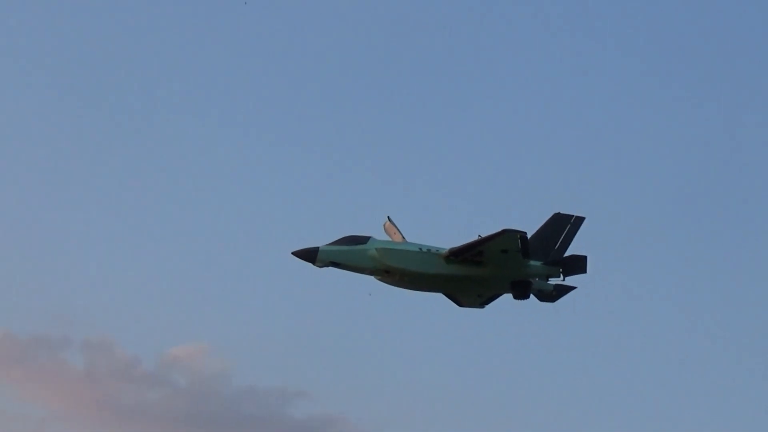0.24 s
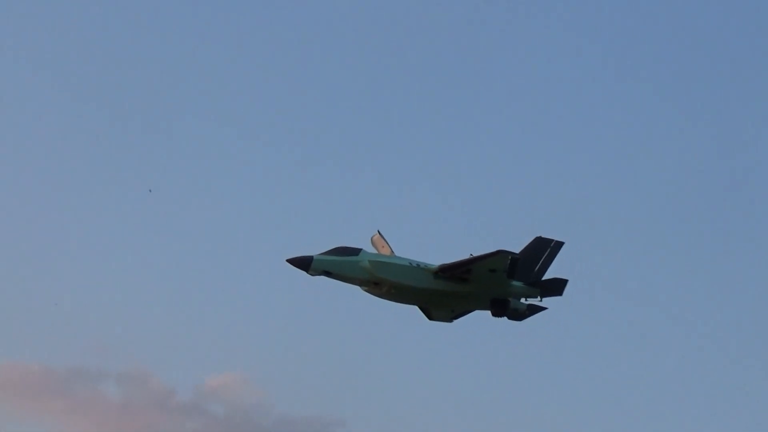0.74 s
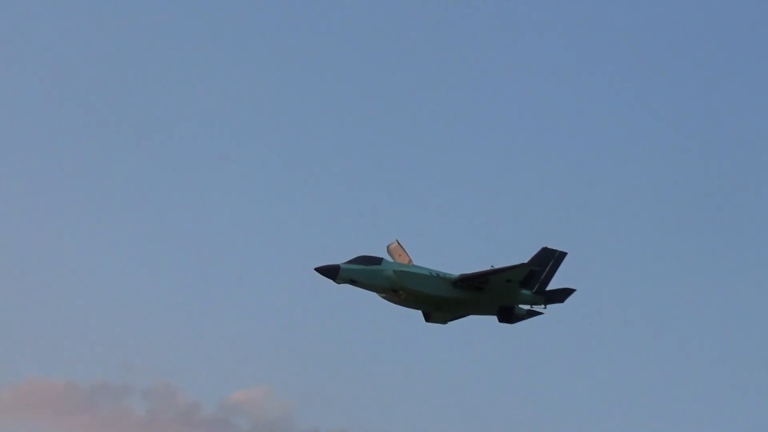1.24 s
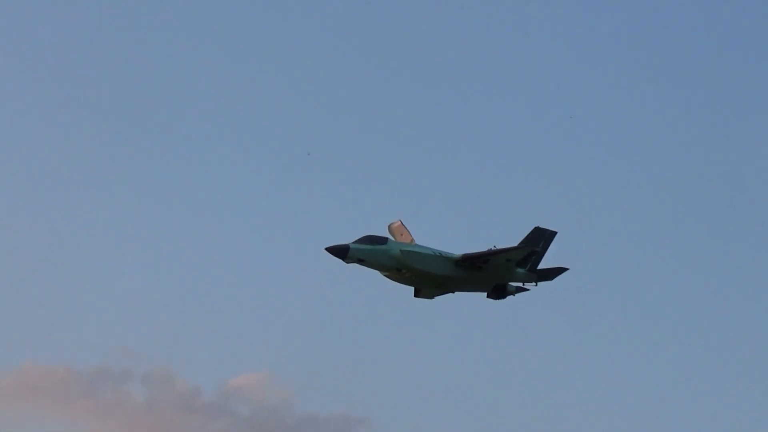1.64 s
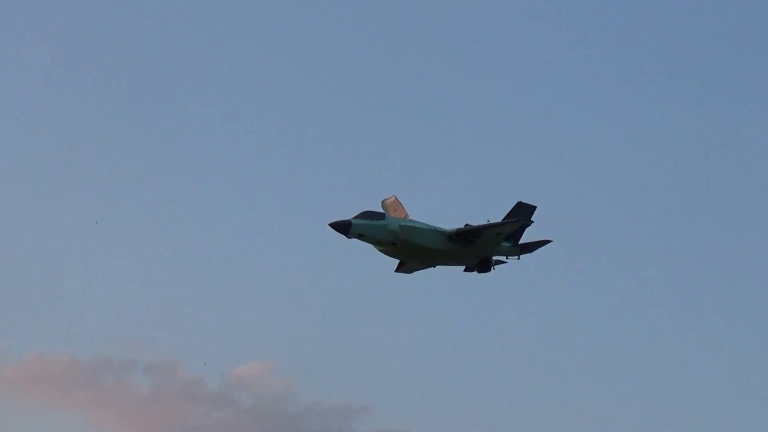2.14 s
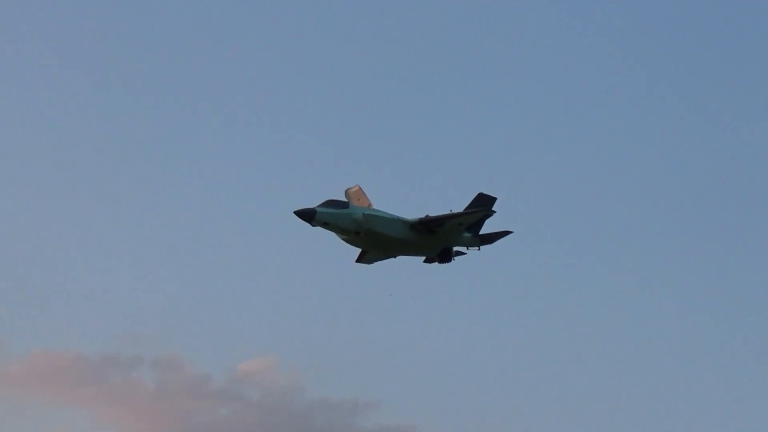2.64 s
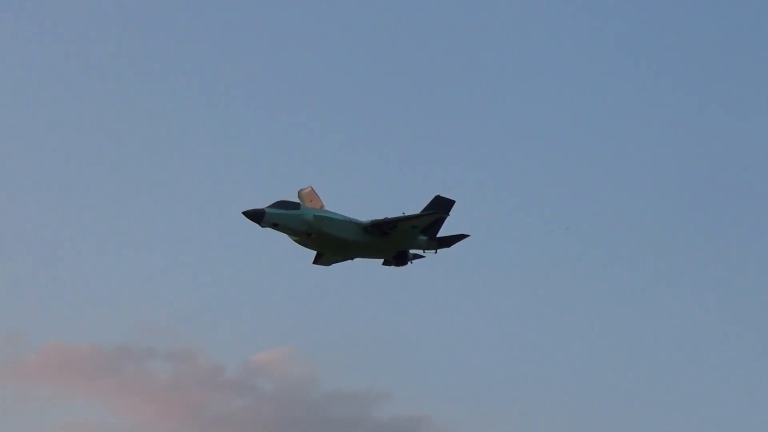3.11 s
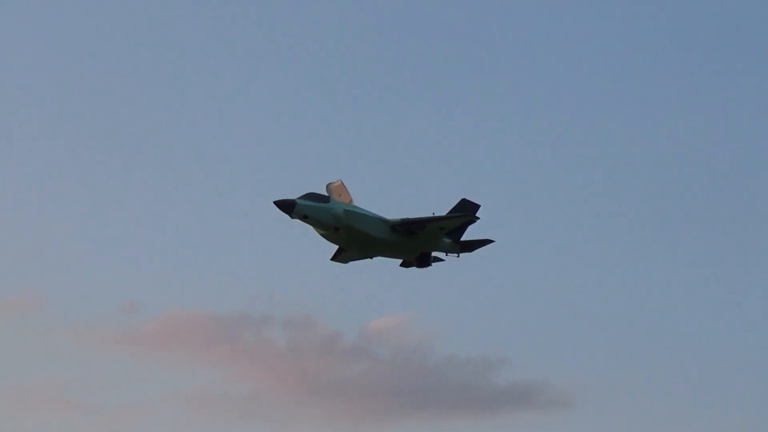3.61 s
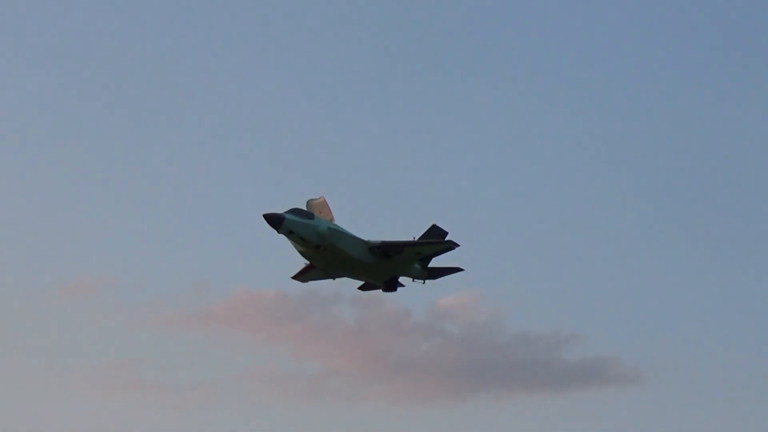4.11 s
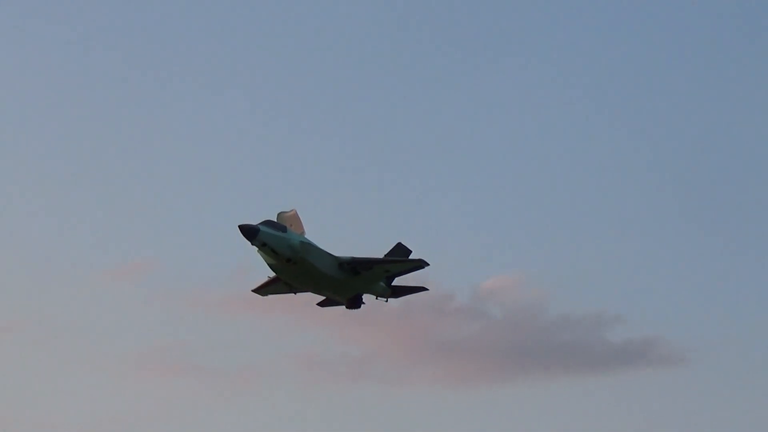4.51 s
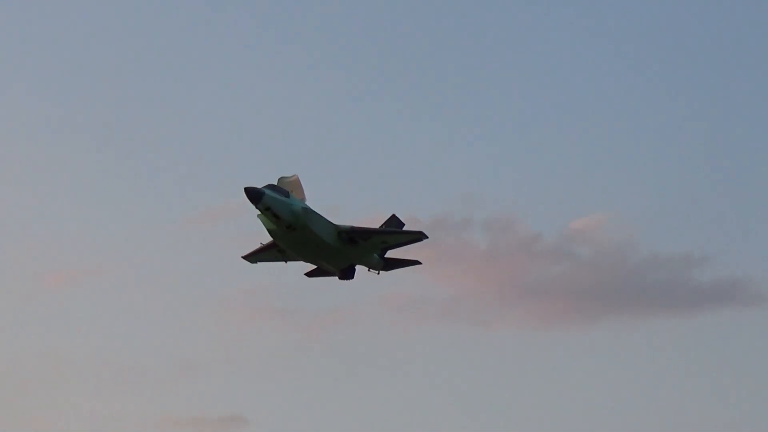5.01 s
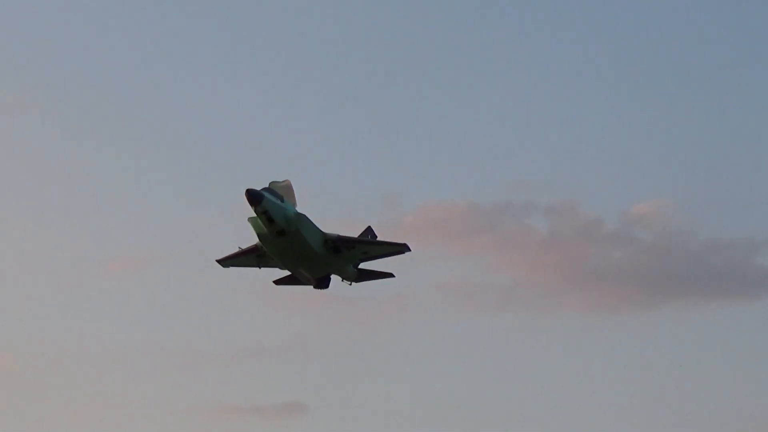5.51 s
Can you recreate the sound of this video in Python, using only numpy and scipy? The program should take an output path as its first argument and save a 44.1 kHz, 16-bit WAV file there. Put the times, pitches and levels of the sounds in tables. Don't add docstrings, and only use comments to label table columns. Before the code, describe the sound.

A hovering model jet's ducted fans scream in two piercing, very high whines over a steady airy roar and bright hiss in the open.

```python
import sys
import numpy as np
from scipy import signal
from scipy.fft import rfft, irfft, next_fast_len
from scipy.io import wavfile
from scipy.ndimage import uniform_filter1d, map_coordinates

SR = 44100
rng = np.random.default_rng(int(sys.argv[2]) if len(sys.argv) > 2 else 0)


def amplitude_ratio(level_db):
    exponent = np.asarray(level_db, float) / 20
    return 10 ** exponent


def generate_wav(sig):
    pcm = np.round(np.clip(np.atleast_2d(sig).T, -1, 1) * 32767).astype(np.int16)
    wavfile.write(sys.argv[1], SR, pcm)


N = 253575
BLADES = 12
LIFT_HZ, TAIL_HZ = 7750, 7220
TURN_S, TURN_TAKES_S = 3.5, 0.75


def ducted_fans():
    # (time [s], speed [%])
    throttle = [(0, 100), (1.84, 99.98), (2.09, 99.15), (2.125, 98.9), (2.2, 96.9), (2.3, 96.3),
                (2.5, 96.4), (3.62, 96.47), (3.77, 97.4), (3.95, 97.8), (4.1, 98.6), (4.29, 100.5),
                (4.7, 100.47), (5.5, 99.95), (5.75, 100.05)]
    # (time [s], half length [s], blade rate [Hz])
    pitch_trim = [(0.04, 0.065, -20), (0.3, 0.1, 30), (0.52, 0.08, -21), (0.68, 0.05, 40),
                  (0.84, 0.08, -60), (1.22, 0.13, 39), (1.6, 0.17, -63), (1.78, 0.08, 32), (2.02, 0.1, 176),
                  (2.32, 0.08, -27), (2.52, 0.1, 23), (2.7, 0.3, 45), (3.2, 0.13, 19), (3.4, 0.065, -35),
                  (3.78, 0.1, -27), (4.12, 0.08, -27), (4.34, 0.22, -12), (4.56, 0.1, -22),
                  (4.9, 0.065, -29), (5.54, 0.3, 24), (.92, .04, 10), (2.12, .04, 4), (1.5, .1, -10),
                  (4.63, .05, 6), (2.56, .04, 10), (3.65, .07, -12), (4.35, .05, 10), (5.05, .06, 14),
                  (5.17, .04, -6), (5.3, .05, 14), (5.39, .04, -8), (5.47, .04, 12), (5.65, .05, 10)]
    speed = curves(throttle)[0] / 100
    trim = (bumps(pitch_trim) + 2.5 * wobble(11)) / LIFT_HZ
    lift = lift_fan((speed + trim) * LIFT_HZ / BLADES)
    tail = tail_fan((speed - trim) * TAIL_HZ / BLADES)
    return lift + tail


def lift_fan(shaft_hz):
    # (time [s], blade tone [dB], its octave [dB])
    tones = [(0, -24, -39), (.3, -25, -34), (.68, -26.5, -32), (.85, -31, -29), (1.2, -32.5, -35),
             (1.65, -27, -31), (1.9, -26, -34), (2.15, -28, -31), (2.45, -26, -23), (3, -24.5, -27.5),
             (3.28, -24, -28), (3.55, -29, -24), (3.8, -23, -25.5), (4.1, -20.5, -32.5), (4.3, -21, -42),
             (4.65, -18, -40), (5.5, -17, -41), (5.75, -21.5, -43)]
    # (multiple [1], level side-on [dB], change nose-on [dB])
    uneven = [(1, -50, -4.5), (2, -56.5, -6), (4, -50, -4), (5, -56, -5.5), (6, -49.5, -12.5)]
    # (multiple [1], level re order 6 [dB])
    weak_orders = [(7, -9), (8, -10.5), (10, -5), (13, -5), (14, -4), (16, -2), (17, -6), (18, -7)]
    # (multiple [1], time [s], half length [s], change [dB])
    lobes = [(12, 0.96, 0.046, -8), (12, 1.955, 0.043, -8), (12, 3.39, 0.054, -10), (12, 3.5, 0.034, -2),
             (12, 3.63, .03, -3), (24, 3.49, .03, 4.5), (24, 3.56, .03, -3), (24, 1.15, .1, -3),
             (12, 5.04, 0.059, -2), (24, 4.43, .04, 4), (24, 4.66, .05, -6), (6, 0.75, 0.6, 4),
             (6, 1.6, 0.16, 7), (6, 0.89, 0.082, 5), (6, 1.25, .12, -1), (24, .55, .06, 3),
             (24, .87, .05, 3), (24, 1.58, .06, 3), (24, 2.8, .08, 1), (24, 4.35, .03, -7),
             (24, 4.95, .03, -6), (24, 5.35, .04, 5), (24, 5.0, .6, 0), (2, 5.7, .2, 12),
             (1, 4.8, 0.5, 3.5), (24, 2.8, .05, -2), (12, 1.9, .03, 0), (2, 3.3, 0.17, 3),
             (2, 3.75, .06, 4), (6, 0.47, .06, 3), (24, 4.47, .06, 4), (24, 4.78, .03, 3),
             (24, 1.12, .05, 3), (24, .15, .1, 4), (6, 2.47, .1, 1), (6, 3.03, .13, -7), (6, 3.54, 0.18, 4),
             (12, 3.505, .022, -6), (12, 2.13, .03, -2), (12, 1.955, .025, 2), (12, 0.94, .025, 5),
             (12, .8, .04, -2.5), (12, 5.37, 0.035, 2), (12, 4.9, .15, -1), (24, 4.75, .06, 3),
             (24, 5.08, .07, -3), (24, 5.5, .1, 2)]
    # (multiple [1], time [s], half length [s], change [dB])
    more_lobes = [(1, 0.78, 0.94, 4.5), (2, 2.76, 0.59, 6), (2, 3.65, 0.23, 18), (4, 4.73, .35, 6.5),
                  (5, 4.7, .35, 11), (4, .1, .4, 1.5), (5, .1, 0.44, 7), (5, 1.2, .6, 4), (5, 1.8, .1, 3),
                  (1, 1.85, .15, -5), (4, .8, .12, 3), (4, 2.05, .1, 4)]
    blade_db, octave_db = curves(tones)
    blade_db = blade_db + .45 * wobble(55)
    octave_db = octave_db + 1.2 * wobble(20) + 1.2 * wobble(32)
    main = [(BLADES, blade_db, 0), (2 * BLADES, octave_db, 0)]
    orders = aimed(main + uneven, lobes + more_lobes)
    six_db = orders[-1][1]
    orders = orders + [(k, six_db + db + 1.5 * wobble(2.56)) for k, db in weak_orders]
    return rotor(shaft_hz, orders, jitter_hz=0.37, flutter_db=0.17, quick=70, skirt_db=-23)


def tail_fan(shaft_hz):
    # (time [s], blade tone [dB], its octave [dB])
    tones = [(0, -24, -36), (.3, -22, -33), (.6, -20.5, -33), (.85, -21, -29), (1.25, -23.5, -28),
             (1.5, -23, -28), (1.8, -23.5, -34), (2.2, -24, -35), (2.55, -29, -37), (2.9, -27, -35),
             (3.45, -26, -38), (3.63, -29.5, -29), (3.9, -27.5, -36), (4.12, -26, -47), (4.3, -26.5, -41),
             (4.8, -28, -37), (5.3, -29.5, -35), (5.75, -26, -32)]
    # (multiple [1], level [dB])
    faint_orders = [(1, -56.5), (2, -82), (4, -68), (8, -56), (10, -65), (14, -47), (16, -59)]
    # (multiple [1], time [s], half length [s], change [dB])
    lobes = [(24, .48, .03, -12), (24, 1.9, .05, -10), (24, 1.8, .04, 4), (24, 0.84, .04, 3),
             (24, .94, .03, -3), (24, 2.12, .04, -3), (24, 5.7, .08, 4), (12, 1.76, 0.074, -1.5),
             (12, 6.2, 0.039, 2), (12, 3.83, 0.041, -1), (12, 3.64, .04, -2.5), (12, 4.5, .05, -2),
             (12, 4.74, .02, 3), (12, 4.85, .03, 4), (12, 2.92, 0.091, 1), (12, 3.35, .05, -0.5),
             (24, 4.27, .1, 7), (24, 4.7, .04, 3), (24, 5.05, .06, 0), (24, 1.2, .05, -4),
             (24, 1.3, .35, -1.5), (24, 2.85, .5, 2), (24, 4.14, .06, -4), (24, 4.55, .15, 2),
             (24, 3.93, .04, -3), (12, 3.9, 0.054, -3), (12, 2.57, .03, -1.5), (12, 4.85, 0.056, -5.5),
             (12, 4.8, .05, -2)]
    blade_db, octave_db = curves(tones)
    blade_db = blade_db + .6 * wobble(55)
    octave_db = octave_db + 1.4 * wobble(20)
    orders = aimed([(BLADES, blade_db, 0), (2 * BLADES, octave_db, 0)], lobes)
    return rotor(shaft_hz, orders + faint_orders, jitter_hz=0.463, flutter_db=0.5, quick=70, skirt_db=-25.5)


def wing_rotors():
    return near_rotor() + far_rotor()


def near_rotor():
    # (time [s], turn rate [Hz], level [dB])
    hum = [(0, 1376, -43), (.3, 1364, -45.5), (.8, 1351, -44.5), (1, 1355, -41.5), (1.2, 1385, -34),
           (1.55, 1385, -30), (1.68, 1415, -30), (1.98, 1368, -30.5), (2.37, 1316, -38.5), (2.7, 1318, -38),
           (3.06, 1357, -36), (3.35, 1371, -31), (3.55, 1377, -32), (3.8, 1371, -37.5), (4, 1368, -41),
           (4.28, 1396, -41), (4.88, 1393, -39.5), (5.15, 1388, -48), (5.35, 1383, -42),
           (5.75, 1372, -42.5)]
    # (multiple [1], level side-on [dB], change nose-on [dB])
    upper = [(2, -50, -2), (3, -54, -6), (4, -56.5, 0), (6, -45, -5)]
    # (multiple [1], level [dB])
    steady = [(5, -64), (7, -48)]
    # (multiple [1], time [s], half length [s], change [dB])
    lobes = [(2, .1, .2, -9), (2, 1.68, 0.16, 5.5), (2, 2.34, 0.31, 4), (2, 4, 0.28, -3), (2, 4.4, 0.29, 7),
             (3, .1, 0.27, 7.5), (3, 2, 0.55, 7), (3, 3.4, 0.75, 9.5), (3, 5.14, .11, 13.5),
             (3, 1.0, .08, -5), (3, 0.29, .08, -4), (3, 4.3, .3, -4), (3, 5.45, .1, -6), (2, 5.2, 0.065, 5),
             (1, .35, .05, 0), (1, 0.84, .05, 5), (1, 4.4, .04, 2), (3, 1.2, .06, 0), (3, 3.7, .08, 4),
             (3, 3.2, .08, 3), (2, 4.4, .1, -5), (1, .5, .12, 3), (1, 4.42, .05, -2), (1, 1.12, .04, 1.5),
             (2, 4.3, .08, 3), (2, .4, .25, 3), (2, 2.05, .1, -4), (4, 4.4, .6, -6), (2, 4.3, .15, -1),
             (3, 4.7, .25, 3), (1, 3.72, 0.044, 3), (3, 5.86, .2, 12), (4, 0.38, 0.9, 7.5),
             (4, 4, 0.52, 6.5), (6, .1, .3, 3), (6, .95, .15, -4), (6, 1.6, 0.28, 6), (6, 3.57, 0.26, 7),
             (6, 4.14, 0.39, 13.5), (6, 3.8, .07, -6), (6, 5.1, .08, 7), (6, 5.0, .1, -3), (6, 5.6, .35, 5),
             (6, 2.05, .2, 4), (6, 2.5, .12, -1), (6, 3.1, .2, 6), (2, 3.2, 0.11, -3), (1, 2.1, .03, -3.5)]
    hz, hum_db = curves(hum)
    orders = aimed([(1, hum_db, 0)] + upper, lobes) + steady
    return rotor(hz, orders, jitter_hz=1.6, flutter_db=.7, quick=90, skirt_db=-36, hunt_hz=3.6)


def far_rotor():
    # (time [s], turn rate [Hz], level [dB])
    hum = [(0, 1418, -46), (.27, 1440, -42), (.7, 1440, -44), (1, 1457, -44), (1.18, 1424, -65),
           (1.4, 1394, -62), (1.9, 1408, -59), (2.07, 1421, -51), (2.25, 1374, -44), (2.6, 1406, -49),
           (2.95, 1365, -52), (3.2, 1336, -49), (3.7, 1328, -49), (3.9, 1377, -52), (4.2, 1395, -63),
           (5.3, 1400, -60), (5.5, 1410, -58), (5.75, 1415, -49)]
    # (multiple [1], level side-on [dB], change nose-on [dB])
    upper = [(2, -52.5, 0), (6, -43.5, -4)]
    # (multiple [1], level [dB])
    steady = [(3, -65)]
    # (multiple [1], time [s], half length [s], change [dB])
    lobes = [(2, .9, .5, -7), (6, 1.4, .3, -5), (6, 2.42, .4, 4), (6, 5.66, 0.29, 12), (6, 2.0, .15, 0),
             (6, 2.7, .25, 0), (6, 4.8, .1, 7), (6, 3.9, .5, -8)]
    hz, hum_db = curves(hum)
    orders = [(1, hum_db)] + aimed(upper, lobes) + steady
    return rotor(hz, orders, jitter_hz=1.5, flutter_db=1.5, quick=90, skirt_db=-34, hunt_hz=4)


def air_jets():
    # (time [s], level [dB])
    strength = [(0, -30), (.3, -31.5), (.5, -30.5), (1, -30.5), (1.5, -31.5), (1.9, -34), (2.25, -30.5),
                (3, -32.5), (3.3, -33), (3.7, -33), (3.85, -34), (4.3, -34.5), (4.5, -34), (5, -33),
                (5.4, -33), (5.75, -32.5)]
    # (time [s], half length [s], change [dB])
    gusts = [(.25, .03, -1.5), (1.07, .04, -2.5), (1.2, 0.038, 1), (2.03, 0.044, 3), (2.14, .04, 0),
             (2.42, 0.042, 2), (3.34, 0.032, 2.5), (3.5, .06, 1.5), (3.7, 0.046, 2), (4.1, 0.096, -2),
             (4.33, .04, 2.5), (4.75, 0.14, 4.5), (5.44, 0.04, -4), (5.68, 0.058, 0.5)]
    jet_db, = curves(strength)
    swing_db = jet_db - jet_db.mean() + bumps(gusts)
    gust = wobble(9)
    air_flutter = wobble(20)
    low = jet_roar(swing_db, gust, air_flutter) + downwash_rush(swing_db, gust, air_flutter)
    return low + intake_hiss(swing_db, gust) + nozzle_fizz(swing_db, gust)


def jet_roar(swing_db, gust, air_flutter):
    # (frequency [Hz], level [dB])
    spectrum = [(20, -44), (110, -34), (190, -5), (270, -4.5), (350, -2.5), (470, -3.5), (650, 2),
                (1000, -1.5), (1500, -13.5), (2500, -38)]
    # (time [s], half length [s], change [dB])
    low_dips = [(.8, .15, -1), (1.85, .2, -1), (2.5, .15, -0.5), (4.12, .15, -0.5), (4.7, .08, -0.5)]
    level_db = -38.5 + 0.87 * swing_db - 2.4 * turned() + bumps(low_dips)
    level_db = level_db + 0.14 * gust + 0.62 * air_flutter
    return amplitude_ratio(level_db) * jet_noise(spectrum, band_share_db=-1.5, patchy_db=0.27)


def downwash_rush(swing_db, gust, air_flutter):
    # (frequency [Hz], level [dB])
    spectrum = [(600, -24), (1200, -4), (2000, 0), (2800, -3.5), (3500, -5), (4300, -4), (5200, -11),
                (6000, -4), (6800, -7), (8000, -37)]
    # (time [s], half length [s], change [dB])
    rush_swells = [(2.46, 0.6, 1), (3.59, 0.14, 3), (0.73, .1, -1.8), (4.25, .12, -1), (3.82, 0.063, -3),
                   (1.13, 0.091, -0.5), (1.94, .1, -0.5), (3.6, 0.07, -1), (5.62, .08, 1), (4.75, .1, -0.5)]
    # (frequency [Hz], level [dB])
    wing = [(4300, 0), (4700, -2), (5300, -5), (5700, -2), (6500, -2), (7000, 0)]
    # (time [s], half length [s], share [1])
    wing_shades = [
        (1.3, .25, 0.65),
        (1.75, .25, 0.97),
        (4.15, .12, 0.69),
    ]
    level_db = -37.5 + 0.58 * swing_db - 0.26 * turned() + bumps(rush_swells)
    level_db = level_db + 0.5 * gust + 0.84 * air_flutter
    rush = amplitude_ratio(level_db) * jet_noise(spectrum, band_share_db=2.0, patchy_db=0.63)
    shaded = np.clip(bumps(wing_shades), 0, 1)
    return (1 - shaded) * rush + shaded * coloured(rush, wing)


def intake_hiss(swing_db, gust):
    # (frequency [Hz], level [dB])
    spectrum = [(5500, -47), (6600, -5.5), (7500, 1), (8300, -4), (8800, -2), (9600, 0.5), (11000, -0.5),
                (12000, -5.5), (12800, -15), (14000, -35)]
    # (time [s], half length [s], change [dB])
    band_swells = [(.15, .2, 0.2), (.85, .15, 0.8), (2.9, .08, 1), (3.5, 0.071, 0.8), (3.98, .12, 2),
                   (4.9, 0.23, -2), (5.65, 0.11, 2)]
    # (frequency [Hz], level [dB])
    stator = [(7000, -1.5), (8300, -3.5), (8750, -6.5), (9300, -1.5), (10000, -1.5)]
    nose_on = turned()
    level_db = -32.0 + 0.8 * swing_db - .1 * nose_on + bumps(band_swells) + 0.34 * gust
    level_db = level_db + 0.41 * wobble(30) + 0.55 * nose_on * wobble(45)
    hiss = amplitude_ratio(level_db) * jet_noise(spectrum, band_share_db=2.5, patchy_db=0.75)
    shadow = np.clip(3 * nose_on - .9, 0, 1) * np.clip(1.0 + .2 * wobble(15), 0, 1)
    return (1 - shadow) * hiss + shadow * coloured(hiss, stator)


def nozzle_fizz(swing_db, gust):
    # (frequency [Hz], level [dB])
    spectrum = [(11000, -42), (12300, 3.5), (13000, -5), (13700, 3), (15000, 4.5), (16500, -3)]
    # (time [s], half length [s], change [dB])
    band_swells = [
        (.9, .35, 1.5),
        (3.0, .9, -.5),
        (4.3, .4, 0),
    ]
    level_db = -41.5 + 0.59 * swing_db - 1.74 * turned() + bumps(band_swells)
    level_db = level_db + .6 * gust + .7 * wobble(25) + .8 * wobble(14)
    return amplitude_ratio(level_db) * jet_noise(spectrum, band_share_db=9.5, patchy_db=1.2)


def off_the_ground(x):
    # (frequency [Hz], level [dB])
    grass = [(100, 6), (500, -10), (1000, -2.5), (2000, -16.5), (4000, -30), (8000, -46)]
    closing_ms = 0.14 * np.clip(np.arange(N) / SR - TURN_S - TURN_TAKES_S, 0, None)
    delay_ms = 5.003 - 0.29 * turned() - closing_ms
    late = np.interp(np.arange(N) - delay_ms * SR / 1000, np.arange(N), x, left=0)
    return coloured(amplitude_ratio(-turned()) * late, grass)


def field_rumble():
    # (frequency [Hz], level [dB])
    spectrum = [(15, -34), (30, -30), (60, -10), (110, 3), (200, -9), (400, -42)]
    return jet_noise(spectrum, band_share_db=-63.5, patchy_db=1.5)


def rotor(shaft_hz, orders, jitter_hz, flutter_db, quick, skirt_db, hunt_hz=0):
    hunting = np.sin(2 * np.pi * np.cumsum(21 + 2.48 * wobble(6)) / SR)
    shaft_hz = uniform_filter1d(shaft_hz, size=1800) + jitter_hz * wobble(quick) + hunt_hz * hunting
    angle = 2 * np.pi * np.cumsum(shaft_hz) / SR
    eddies = 1 + amplitude_ratio(skirt_db) * (wobble(900) + 1j * wobble(900))
    total = np.zeros(N)
    for k, db in orders:
        strength = amplitude_ratio(db + flutter_db * wobble(quick)) * np.sqrt(2) * np.abs(eddies)
        total += strength * np.sin(k * angle + np.angle(eddies) + rng.uniform(0, 2 * np.pi))
    return total


def jet_noise(spectrum, band_share_db, patchy_db):
    z = signal.stft(rng.standard_normal(N), nperseg=512)[2]
    patches = uniform_filter1d(rng.standard_normal(z.shape), size=8, axis=0)
    patches = uniform_filter1d(patches, size=10, axis=1)
    noise = signal.istft(z * amplitude_ratio(patchy_db * unit(patches)), nperseg=512)[1][:N]
    return amplitude_ratio(band_share_db) * unit(coloured(noise, spectrum))


def aimed(orders, swells):
    result = []
    for k, db, nose_db in orders:
        lobes_db = bumps(row[1:] for row in swells if round(row[0]) == round(k))
        result.append((k, db + nose_db * turned() + lobes_db))
    return result


def turned():
    return np.clip((np.arange(N) / SR - TURN_S) / TURN_TAKES_S, 0, 1)


def bumps(events):
    t = np.arange(N) / SR
    return sum(height * np.exp(-((t - s) / half) ** 2) for s, half, height in events)


def curves(rows):
    s, *cols = np.transpose(rows)
    return [np.interp(np.arange(N) / SR, s, c) for c in cols]


def wobble(rate):
    knots = rng.standard_normal(int(N * rate / SR) + 4)
    fine = np.arange(8 * len(knots)) / 8
    return np.interp(np.arange(N) * rate / SR, fine, map_coordinates(knots, [fine]))


def coloured(x, points):
    m = next_fast_len(N + 8192)
    hz, db = np.transpose(points)
    log_hz = np.log(np.fft.rfftfreq(m, 1 / SR) + 1)
    gain = amplitude_ratio(np.interp(log_hz, np.log(hz), db))
    return irfft(rfft(x, m) * gain, m)[:N]


def unit(x):
    return x / np.sqrt(np.mean(x ** 2) + 1e-20)


def thin_weak_treble(x):
    # (frequency [Hz], level re neighbours [dB])
    thinning = [(12250, -40), (12480, -6.5), (12900, -11), (13500, -12), (13800, -25), (15050, -25),
                (15200, -12)]
    hz, _, z = signal.stft(x, SR, nperseg=1024)
    power = np.abs(z) ** 2
    near = uniform_filter1d(power, size=4, axis=0)
    wide = uniform_filter1d(power, size=81, axis=0)
    threshold = amplitude_ratio(2 * np.interp(hz, *np.transpose(thinning)))
    weak = near < wide * threshold[:, None]
    return signal.istft(np.where(weak, .3 * z, z), SR, nperseg=1024)[1][:N]


def treble_slips(x):
    slips_per_s, slip_db = 5, -9
    hz, t, z = signal.stft(x, SR, nperseg=1024)
    apart = np.zeros(z.shape)
    for when, where in rng.random((round(slips_per_s * N / SR), 2)):
        in_band = np.abs(hz - 4800 - 9500 * where) < 700
        in_time = np.abs(t - when * N / SR) < .012
        apart[np.ix_(in_band, in_time)] = amplitude_ratio(slip_db)
    strength = apart * uniform_filter1d(np.abs(z), size=31, axis=0)
    scrambled = strength * np.exp(2j * np.pi * rng.random(z.shape))
    return signal.istft(scrambled, SR, nperseg=1024)[1][:N]


def scene():
    air = air_jets()
    craft = ducted_fans() + wing_rotors() + air + off_the_ground(air)
    both = craft + field_rumble()
    return np.array([both, both])


def top_cut(x):
    return signal.sosfilt(signal.butter(12, 16400, fs=SR, output="sos"), x)


def record(dry):
    # (frequency [Hz], level [dB])
    ports = [(60, -48), (180, -18.5), (650, -18.5), (1000, -25), (4500, -31), (6700, -45), (6950, 0),
             (7900, 0), (8200, -9), (10000, -10.5), (11800, -23), (12800, -14), (14000, -21)]
    side = jet_noise(ports, band_share_db=-48.5, patchy_db=5.0)
    side = side + amplitude_ratio(-25.0) * wobble(30) * coloured(dry[0], ports)
    side = side + treble_slips(dry[0])
    pair = thin_weak_treble(dry[0]) + [side, -side]
    band = [(8, -15), (27, -6), (55, 0), (15725, 0), (15765, -120)]  # (frequency [Hz], level [dB])
    mix = np.array([coloured(x, band) for x in pair])
    return top_cut(mix)


dry = scene()
out = record(dry)
generate_wav(out)
```